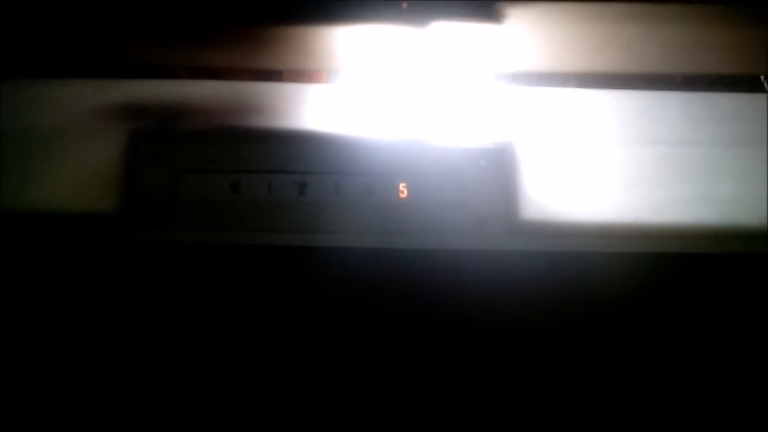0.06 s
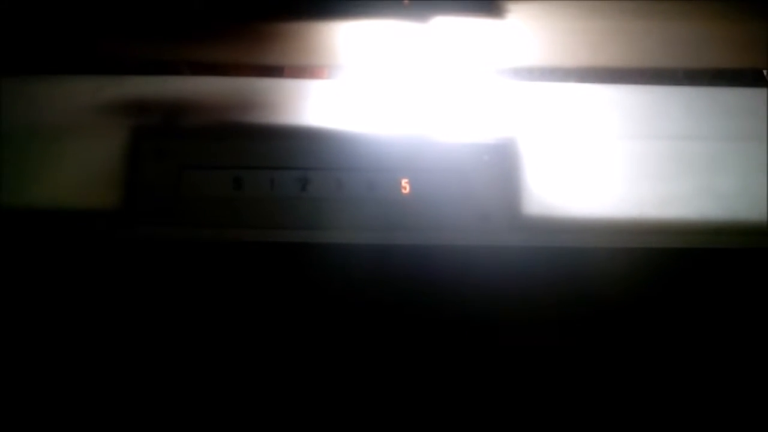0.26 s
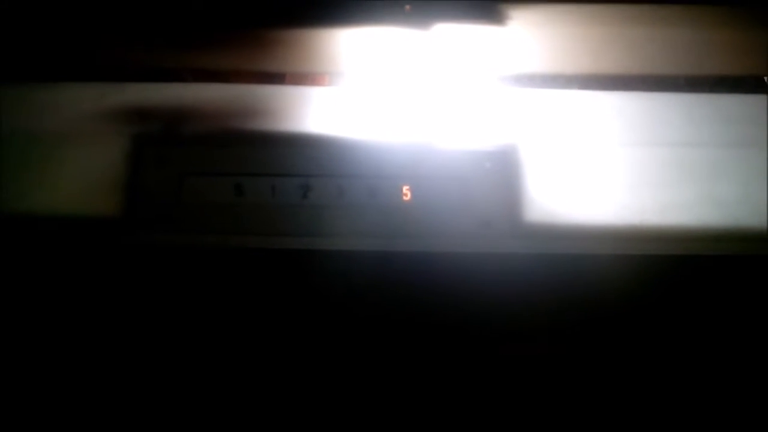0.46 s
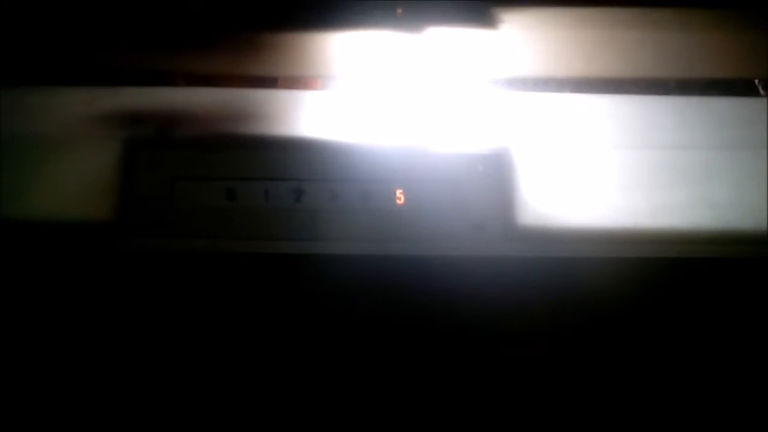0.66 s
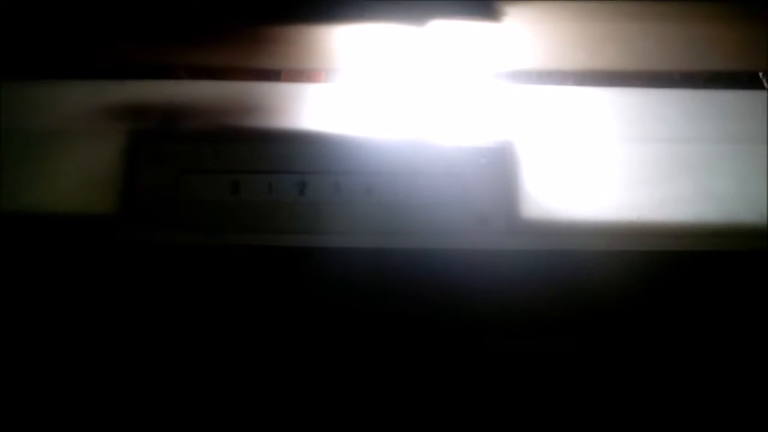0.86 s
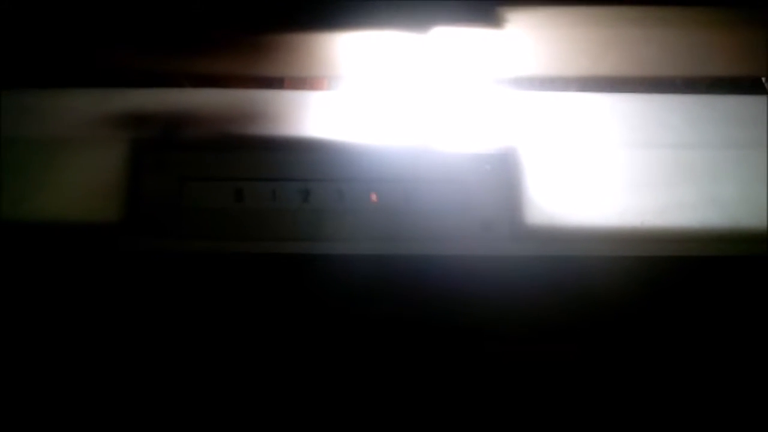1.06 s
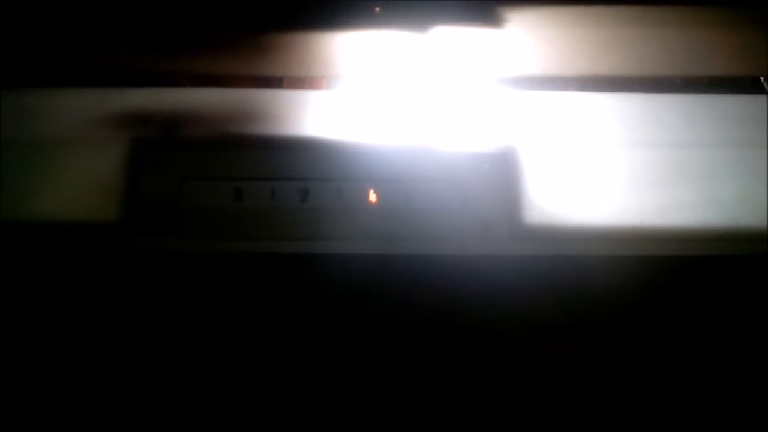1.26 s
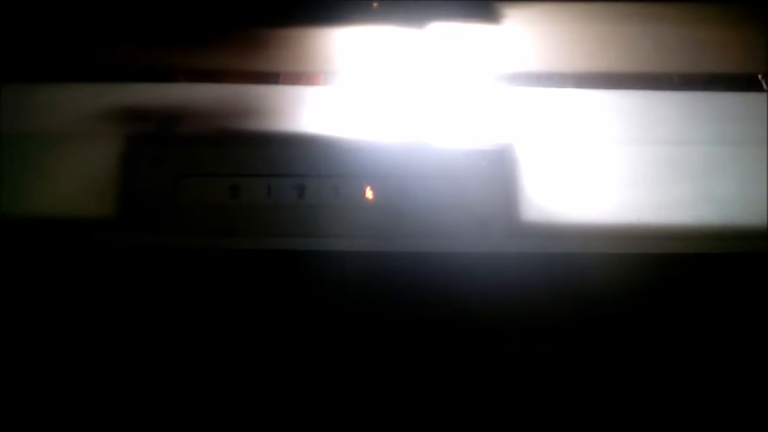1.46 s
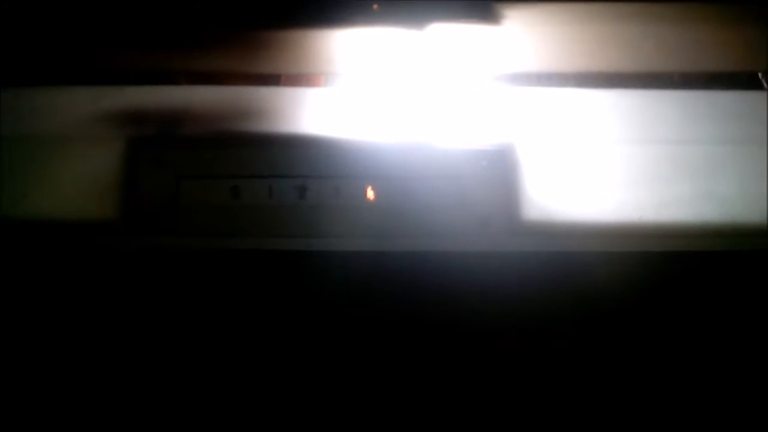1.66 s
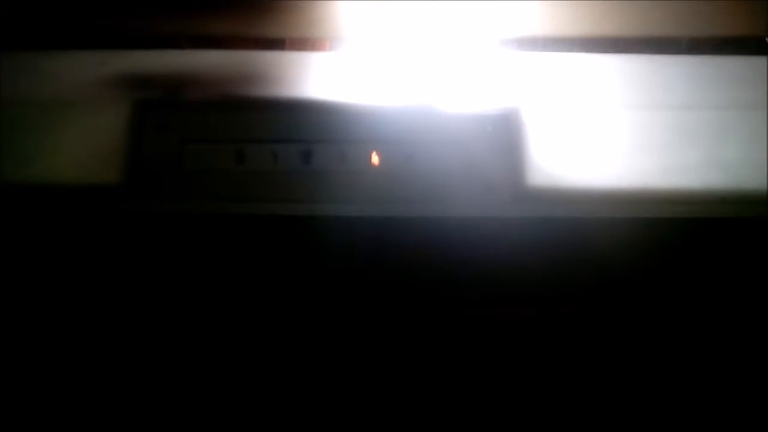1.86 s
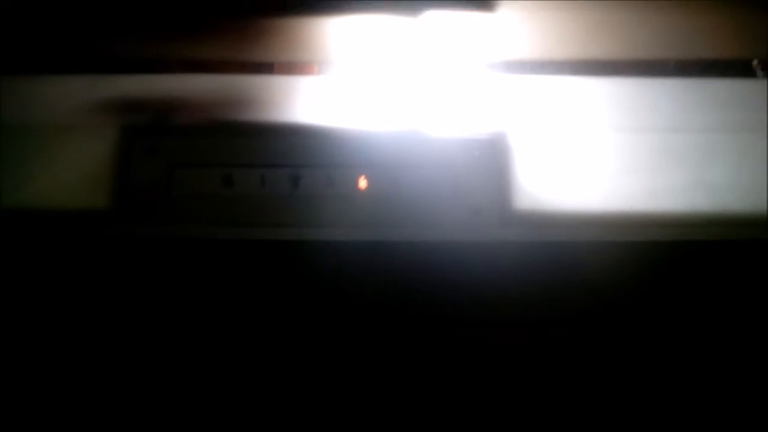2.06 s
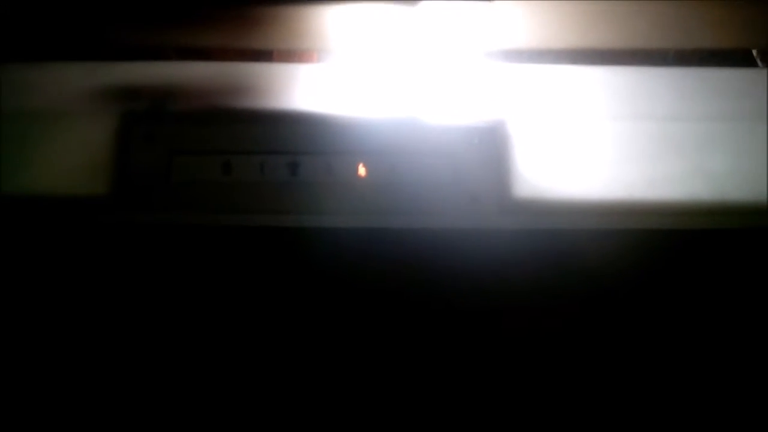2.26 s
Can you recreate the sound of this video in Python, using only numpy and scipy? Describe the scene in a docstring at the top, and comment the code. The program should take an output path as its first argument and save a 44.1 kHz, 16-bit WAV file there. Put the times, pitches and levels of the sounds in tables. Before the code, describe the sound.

Low booming rumble inside a moving lift, with dull thumps and a rattling door clack.

```python
"""Inside a small travelling lift, the car rumbles and booms in swells at its low resonance near 90 Hz.
Three dull thumps come from the shaft; the rollers groan and a guide squeaks in passing.
Near the end the door gear scrapes, then shuts with a rattling clack that rings the cabin.
The rumble dies away, leaving a faint hiss and a thin electrical whine."""
import sys
import numpy as np
from scipy import signal
from scipy.fft import rfft, irfft, next_fast_len
from scipy.io import wavfile
from scipy.ndimage import uniform_filter1d, map_coordinates

SR = 44100
rng = np.random.default_rng(int(sys.argv[2]) if len(sys.argv) > 2 else 0)


def pcm_store(signal):
    """Save signal as 16-bit PCM."""
    levels = np.round(np.clip(np.atleast_2d(signal), -1, 1) * 32767)
    wavfile.write(sys.argv[1], SR, levels.astype(np.int16).T)


N = 101429
RUB_ATTACK_S, RUB_T60_S = .0037, .078  # squeak onset; release of squeaks and scrapes


def amp(db):
    """Decibels to gain."""
    return 10 ** (np.asarray(db) / 20)


def unit(x):
    """Scale to rms 1."""
    return x / np.sqrt(np.mean(x ** 2) + 1e-20)


def along(points, hz):
    """Read a (frequency [Hz], value) curve on a log axis."""
    freqs, values = np.transpose(points)
    return np.interp(np.log(hz + 1), np.log(freqs + 1), values)


def clock():
    """Time of every sample in seconds."""
    return np.arange(N) / SR


def fader(rows):
    """Gain per sample from (time [s], level [dB]) rows."""
    return amp(np.interp(clock(), *np.transpose(rows)))


def envelope(start, attack, hold, t60):
    """Linear rise, hold, then an exponential fall."""
    t = clock() - start
    return np.clip(t / attack, 0, 1) * amp(-60 * np.maximum(t - attack - hold, 0) / t60)


def filtered(x, response):
    """EQ x with a gain that is a function of frequency."""
    size = next_fast_len(N + SR // 2)
    return irfft(rfft(x, size) * response(np.fft.rfftfreq(size, 1 / SR)), size)[:N]


def noise(response):
    """Noise of rms 1 through the given EQ."""
    return unit(filtered(rng.standard_normal(N), response))


def coloured(points):
    """Noise with a (frequency [Hz], level [dB]) spectrum."""
    return noise(lambda f: amp(along(points, f)))


def resonant(peaks):
    """Noise in steep (centre [Hz], width [Hz], level [dB]) resonances."""
    return noise(lambda f: sum(amp(db) / (1 + ((f - hz) / width) ** 2) for hz, width, db in peaks))


def steadied(x, share=1.0):
    """Even out a share of a narrow noise's random fading."""
    power = abs(signal.hilbert(x, next_fast_len(N))[:N]) ** 2 + .1
    return unit(x / power ** (share / 2))


def cabin_decay(x):
    """Let each frequency of x die at the cabin's own speed."""
    # decay of the dense panel ring (frequency [Hz], t60 [s])
    ring_times = [(150, 0.59), (600, 0.41), (1500, 0.36), (2000, .33), (2600, 0.41), (3200, 0.22),
                  (4000, 0.16), (9000, 0.41)]
    hz, t, spectrum = signal.stft(x, SR, nperseg=256)
    decay = amp(-60 * t / along(ring_times, hz)[:, None])
    return signal.istft(spectrum * decay, SR, nperseg=256)[1][:len(x)]


def with_echo(x, room_db):
    """Add the cabin's short reverb to x."""
    tail = cabin_decay(rng.standard_normal(SR // 2))
    return x + amp(room_db) * signal.fftconvolve(x, tail / np.linalg.norm(tail))[:N]


def blow(start, db, corner_hz, colour, modes, attack_s, modes_db, crack_db=None):
    """One contact: dense panel ring, single modes and an optional crack; a lower corner is duller."""
    # bright crack of a contact (frequency [Hz], level [dB])
    crack_colour = [(200, 13.5), (1200, 5.5), (3000, 5.5), (4200, -12), (6200, -13.5), (7500, -42),
                    (9000, -25.5), (15000, -52)]
    t = np.arange(int(.7 * SR)) / SR
    tones = np.zeros(len(t))
    for hz, mode_db, t60 in modes:
        struck_db = mode_db + rng.normal(0, 1.5)
        tones += amp(struck_db - 60 * t / t60) * np.sin(2 * np.pi * (hz * t + rng.random()))
    ring = cabin_decay(coloured(colour)[:len(t)]) + amp(modes_db) * tones
    if crack_db is not None:
        ring += amp(crack_db - 60 * t / .026) * coloured(crack_colour)[:len(t)]  # t60 of 26 ms
    lowpass = signal.butter(2, corner_hz, fs=SR, output="sos")
    hit = signal.sosfilt(lowpass, ring * (1 - np.exp(-t / attack_s)))
    return amp(db) * np.pad(hit, (round(start * SR), N))[:N]


def car_rumble():
    """The moving car booms in quick swells; a broad rumble follows them more smoothly."""
    # swells of the ride (time [s], level [dB])
    swells = [(0, -35.5), (.13, -42.5), (.22, -26), (.29, -44), (.47, -26.5), (.63, -33), (.71, -29),
              (.82, -28), (.92, -35), (1.02, -25), (1.16, -36), (1.27, -24), (1.58, -38), (1.65, -23),
              (1.76, -48), (1.83, -19.5), (1.89, -34), (2.02, -27), (2.15, -44.5), (2.3, -50)]
    # car body resonances (centre [Hz], width [Hz], level [dB])
    body_peaks = [(48, 20, -19), (78.7, 5, -10.5), (91.8, 6.2, 8), (104.5, 25, -16.5)]
    # rumble around them (frequency [Hz], level [dB])
    rumble_colour = [(12, -17.5), (25, 3.5), (50, 8), (100, 13), (150, -2), (220, -14.5), (400, -20),
                     (800, -27.5), (2000, -43.5), (4000, -50.5), (7000, -69.5), (10000, -100)]
    swell = fader(swells)
    slow_swell = uniform_filter1d(swell, int(.28 * SR), mode="nearest")
    body = amp(-3.5) * swell * steadied(resonant(body_peaks), share=.61)
    rumble = amp(-5.5) * slow_swell * coloured(rumble_colour)
    return body + rumble


def car_booms():
    """The hardest blows set the whole car swinging at its low resonance."""
    # booms (start [s], level [dB], hold [s])
    booms = [(.44, -26, .02), (1.921, -16, .034)]
    boom_hz = 89.5
    out = np.zeros(N)
    for start, db, hold in booms:
        swing = np.cos(2 * np.pi * boom_hz * (clock() - start))
        out += amp(db) * envelope(start, .018, hold, t60=.19) * swing
    return out


def door_clack():
    """The mechanism shuts in a quick rattle of contacts; its catch ticks as it settles."""
    # contacts (time [s], level [dB], low-pass corner [Hz])
    contacts = [(1.916, -35, 7080), (1.923, -26.5, 4800), (1.930, -30, 6000), (1.940, -34, 4000),
                (1.945, -29, 1150), (1.972, -34, 1700)]
    # panel colour (frequency [Hz], level [dB])
    panel = [(30, -25), (150, -0.5), (280, 5.5), (440, -6), (560, 2), (800, -1), (950, -12.5), (1250, 2.5),
             (1480, -8.5), (1620, -8), (1850, -8), (2100, -7.5), (2650, -11.5), (3300, -14), (3900, -27),
             (6000, -35.5), (8000, -48), (15000, -50)]
    # cabin modes (frequency [Hz], level [dB], t60 [s])
    cabin_modes = [(135, -5, .3), (199.5, -3, .38), (252, 1, .38), (286, -4, .3), (339, 0, .38),
                   (551, 3, .3), (597, -1, .4), (682, -7, .28), (797, 1, .31), (1102, -2, .28),
                   (1224, 1, .28), (1297, -7, .34), (1355, -6, .27), (1453, -5, .48), (1534, -9, .52),
                   (1792, -6, .2), (2299, -9, .36), (2492, -9, .36), (2660, -7, .33)]
    # ticks of the catch (time [s], level [dB])
    catch_ticks = [(1.943, -74), (2.018, -62.5)]
    # its resonances (centre [Hz], width [Hz], level [dB])
    catch_peaks = [(3080, 150, 8), (4450, 69, -1), (5640, 240, -2), (6720, 450, -10), (9050, 120, -16)]
    rattle = sum(blow(start, db, corner, panel, cabin_modes, attack_s=.0016, modes_db=-7.5, crack_db=9.5)
                 for start, db, corner in contacts)
    ticks = sum(amp(db) * envelope(start, .001, hold=0, t60=.15) * resonant(catch_peaks)
                for start, db in catch_ticks)
    return rattle + ticks


def shaft_thumps():
    """Soft knocks on a panel in the shaft, bunched into three thumps."""
    # knocks (time [s], level [dB], low-pass corner [Hz])
    knocks = [(.005, -48.5, 884), (0.167, -43.5, 1400), (.2, -50, 1300), (0.422, -41, 1500),
              (0.443, -45, 1264), (.487, -44, 650), (0.52, -39, 400)]
    # panel colour (frequency [Hz], level [dB])
    panel = [(30, -8.5), (90, -1), (200, 5.5), (330, -1), (415, 0.5), (520, 3.5), (640, 5), (850, 3),
             (1000, -3), (1180, 1.5), (1600, -7.5), (2000, -16.5), (3000, -22.5), (8000, -58)]
    # panel modes (frequency [Hz], level [dB], t60 [s])
    modes = [(410, 4, .4), (436, 2, .36), (555, -7, .28), (1165, -3, .32)]
    return sum(blow(start, db, corner, panel, modes, attack_s=.005, modes_db=-5)
               for start, db, corner in knocks)


def guide_squeaks():
    """A guide catches several times in passing, each time at a slightly different pitch."""
    # squeaks (start [s], hold [s], level [dB], pitch [ratio])
    squeaks = [(0.801, .05, -47.5, 1), (0.823, 0.006, -35, 1), (.825, .04, -49.5, .87),
               (.842, .024, -44.5, .98), (.884, .034, -50.5, 1.003)]
    # guide partials (centre [Hz], width [Hz], level [dB])
    partials = [(1530, 28, 0), (2080, 90, -25), (2530, 45, -23)]
    out = np.zeros(N)
    for start, hold, db, pitch in squeaks:
        tone = sum(amp(partial_db) * steadied(resonant([(hz * pitch, width, 0)]))
                   for hz, width, partial_db in partials)
        out += amp(db) * envelope(start, RUB_ATTACK_S, hold, RUB_T60_S) * tone
    return with_echo(out, room_db=-12)


def metal_scrapes():
    """Rubbing metal sings in unsteady partials: the door gear and thin slides."""
    # door gear scrapes (start [s], rise [s], hold [s], level [dB])
    scrapes = [(1.769, 0.018, 0.044, -40), (1.828, 0.013, 0.012, -41.5), (1.867, 0.013, 0.045, -44)]
    # gear resonances (centre [Hz], width [Hz], level [dB])
    gear_peaks = [(586, 130, -15.5), (1207, 55, -4), (1355, 69, 1.5), (2230, 100, -8), (2440, 160, -16.5),
                  (3110, 280, -19.5), (4310, 80, -36), (5540, 110, -30.5), (7120, 400, -48)]
    # hissing slides (start [s], rise [s], hold [s], level [dB], centre [Hz], width [Hz])
    slides = [(0.791, 0.014, .02, -71.5, 5300, 1000), (0.797, 0.053, 0.04, -59, 2560, 56),
              (1.695, 0.012, 0.094, -65.5, 2850, 286), (1.755, .006, .03, -74, 6740, 280),
              (1.806, 0.014, 0.0092, -62, 3120, 279), (1.882, 0.024, .015, -44, 2400, 111),
              (1.899, 0.011, 0.017, -40, 2654, 130)]
    out = np.zeros(N)
    for start, rise, hold, db in scrapes:
        out += amp(db) * envelope(start, rise, hold, RUB_T60_S) * resonant(gear_peaks)
    for start, rise, hold, db, hz, width in slides:
        out += amp(db) * envelope(start, rise, hold, RUB_T60_S) * resonant([(hz, width, 0)])
    return with_echo(out, room_db=-6)


def roller_drone():
    """The guide rollers drive a low drone that builds, then fades."""
    # drone fader (time [s], level [dB])
    rolling = [(0, -58.5), (.4, -51.5), (.58, -50.5), (.85, -48.5), (1.07, -57), (1.16, -60), (2.3, -73.5)]
    # driven resonances (centre [Hz], width [Hz], level [dB])
    peaks = [(189, 13, 2.5), (264, 5.7, -6.5), (322, 110, -9.5)]
    return fader(rolling) * steadied(resonant(peaks), share=.17)


def roller_groans():
    """In each groan a roller holds one low note for a moment."""
    # groans (start [s], hold [s], level [dB], pitch [Hz])
    groans = [(0.553, .29, -49.5, 243), (0.754, 0.065, -49.5, 308.6), (0.84, 0.0071, -50, 256),
              (0.908, 0.16, -50.5, 300), (0.986, 0.063, -55.5, 408), (1.016, 0.0078, -53, 340)]
    width_hz = 11
    return sum(amp(db) * envelope(start, .03, hold, t60=.13) * steadied(resonant([(hz, width_hz, 0)]))
               for start, hold, db, hz in groans)


def air_and_whine():
    """A steady bed of air noise and a thin electrical whine."""
    # air and hiss (frequency [Hz], level [dB])
    air_colour = [(100, 8), (200, 5.5), (330, 4), (600, 2.5), (1000, -2), (2000, -6.5), (2900, -12),
                  (3800, -20), (5200, -20.5), (6500, -27.5), (8200, -40), (15000, -40)]
    whine_hz, wobble_knots_per_s = 12349, 22
    phase_wobble = map_coordinates(rng.standard_normal(64), [clock() * wobble_knots_per_s], mode="wrap")
    whine = unit(np.sin(2 * np.pi * whine_hz * clock() + phase_wobble))
    return amp(-57.5) * coloured(air_colour) + amp(-95) * whine


def scene():
    """Everything heard in the cabin, mixed to mono."""
    travel = car_rumble() + roller_drone() + roller_groans()
    events = shaft_thumps() + car_booms() + guide_squeaks() + metal_scrapes() + door_clack()
    return (travel + events + air_and_whine())[None]


def record(dry):
    """A brick-wall high cut at 15.5 kHz."""
    return filtered(dry[0], lambda hz: hz < 15500)[None]


dry = scene()
out = record(dry)
pcm_store(out)
```